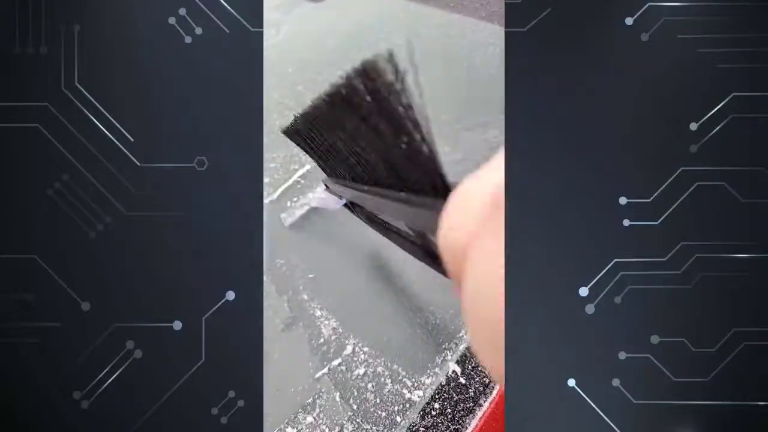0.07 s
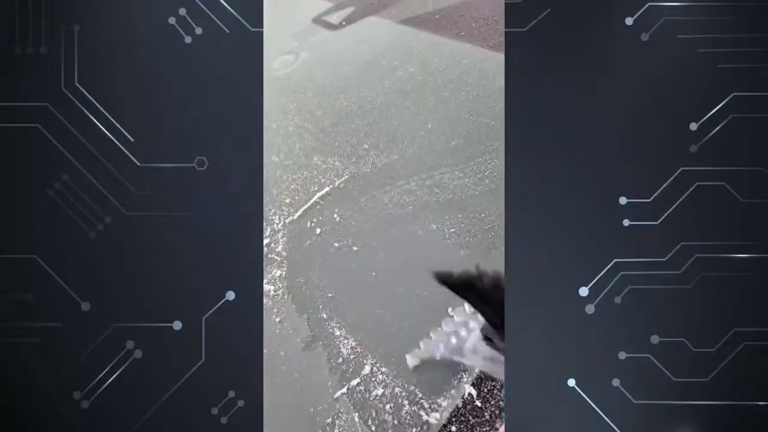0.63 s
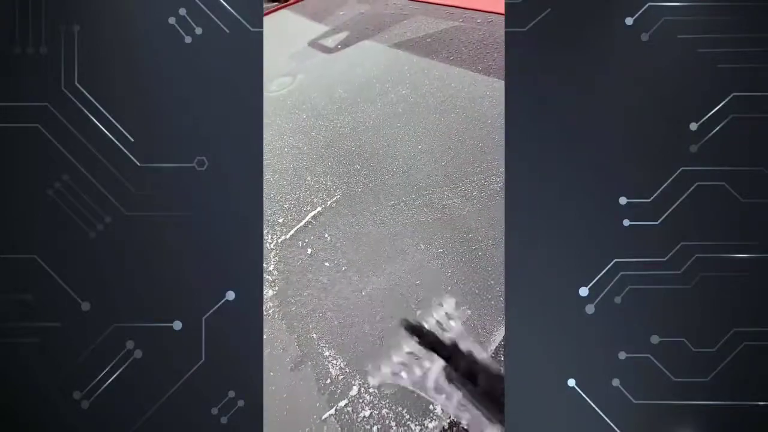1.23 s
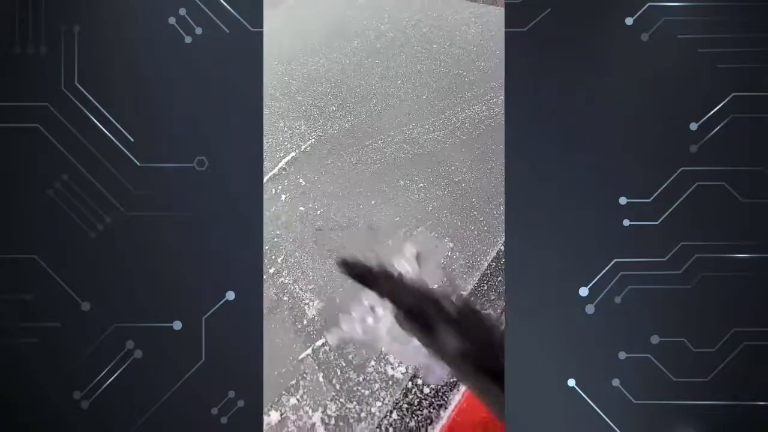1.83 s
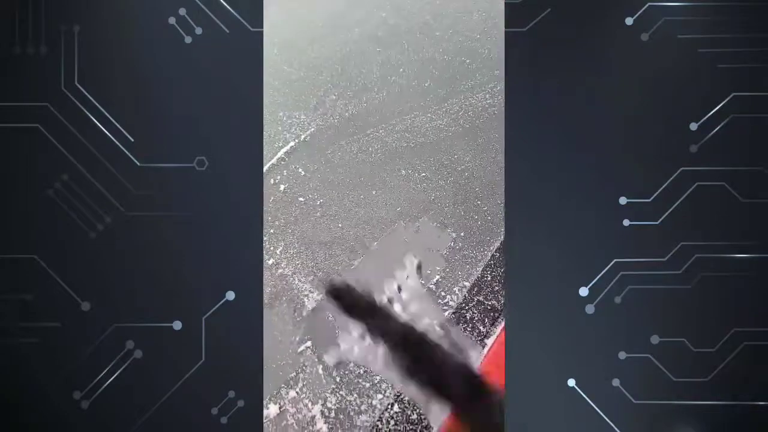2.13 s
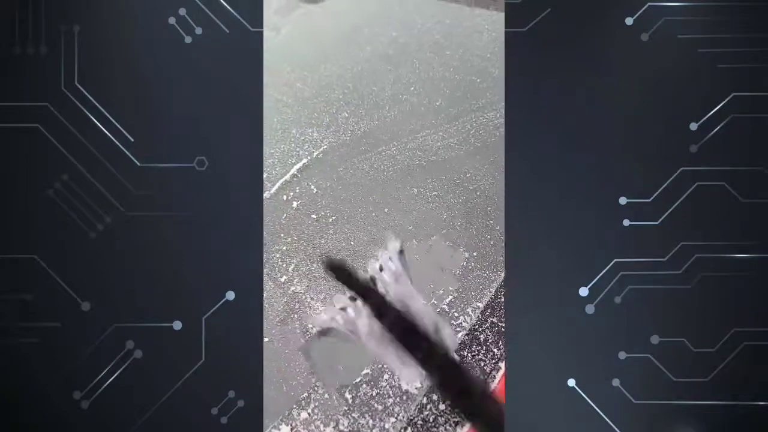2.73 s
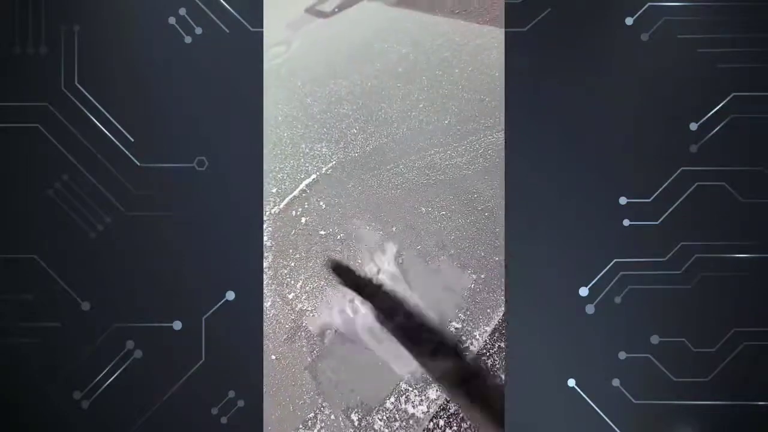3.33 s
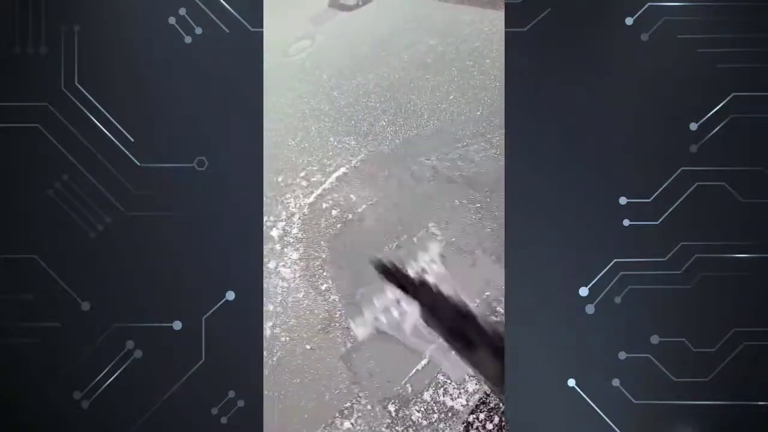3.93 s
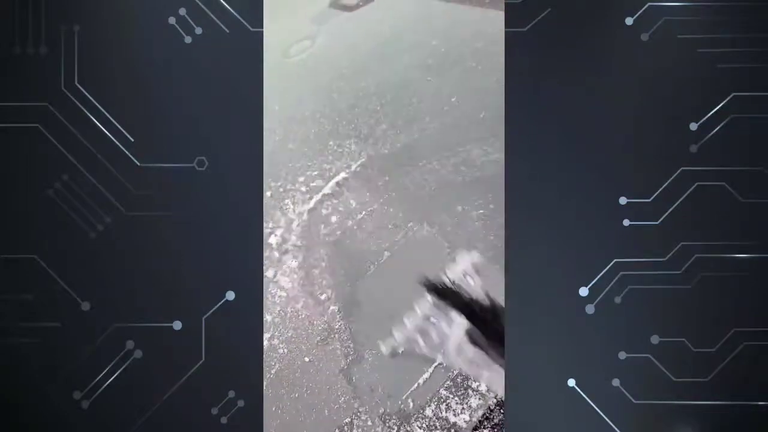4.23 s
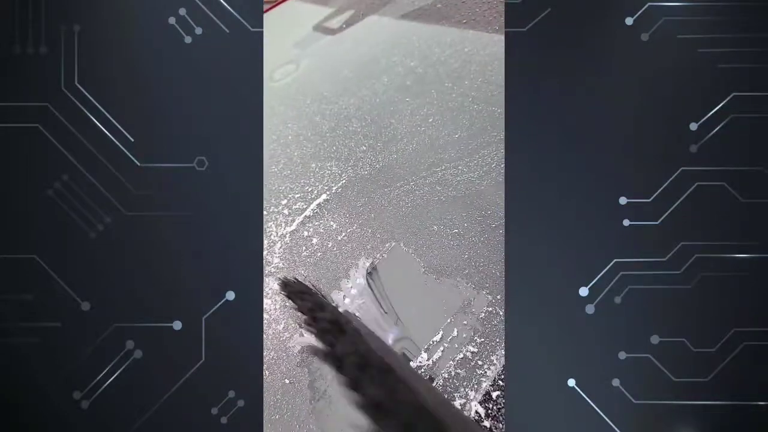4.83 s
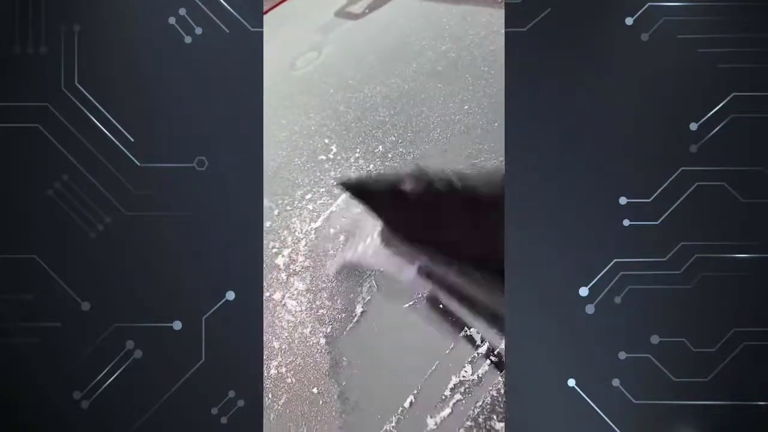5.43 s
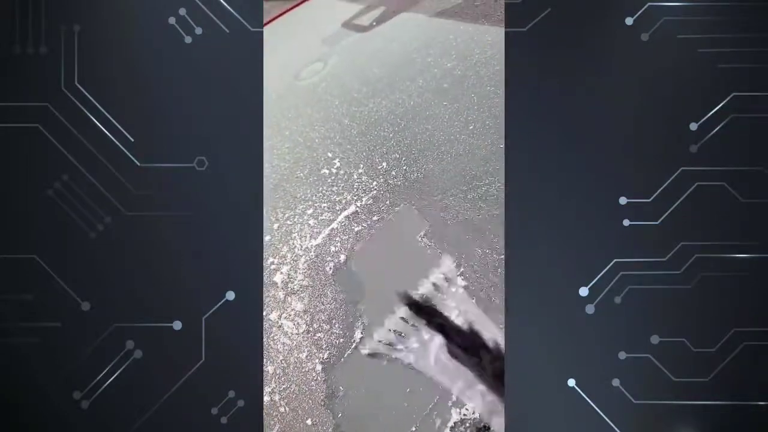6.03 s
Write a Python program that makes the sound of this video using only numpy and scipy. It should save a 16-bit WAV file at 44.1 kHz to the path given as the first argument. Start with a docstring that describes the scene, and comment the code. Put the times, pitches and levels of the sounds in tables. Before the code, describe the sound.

A plastic ice scraper is heard close up on a frosted car windshield outdoors. For the first half second it slides with a swelling, hollow hiss and a short low squeak. At about 0.8 and 1.1 seconds the blade bites and judders, giving quick runs of cracks that thump the glass. From there, short crunching pushes come unevenly, roughly three a second, with lighter hissing glides between them and loose ice crumbs ticking. Two sharp cracks stand out near 2.8 seconds, and another judder comes around 3.4. Brief, rough squeaks appear at about 3.7, 4.6, 5.1 and 5.8 seconds. A longer, stronger crunch lands near 5.5 seconds, followed by one more push and a light slide at 6. Distant traffic rumbles softly throughout, a little stronger at the start.

```python
"""A light hiss glides over frost, close by, above the rumble of distant traffic in a parking lot.
It is a plastic ice scraper on a car windshield. On each push the blade bites into the ice, sticks
and breaks free with cracks that thump the pane; between pushes it glides back. Friction rings the
scraper's resonances and now and then squeaks, while loose crumbs of ice tick under the blade."""
import sys
import numpy as np
from scipy import signal
from scipy.fft import rfft, irfft, next_fast_len
from scipy.io import wavfile
from scipy.ndimage import uniform_filter1d

SR = 44100
rng = np.random.default_rng(int(sys.argv[2]) if len(sys.argv) > 2 else 0)


def transcribe(signal):
    """Save signal, clipped to [-1, 1], as a 16-bit WAV file at the path in sys.argv[1]."""
    frames = np.atleast_2d(signal).T
    limited = np.clip(frames, -1, 1)
    pcm = np.round(limited * 32767).astype(np.int16)
    wavfile.write(sys.argv[1], SR, pcm)


N = 268128

# resonances of the scraper: centre_hz, width_hz, gain_db
BLADE_MODES = [(858, 150, 2), (1170, 155, 5.5), (1260, 390, 1), (2107, 114, 10.5), (2566, 180, 3),
               (2860, 150, 4.5), (4010, 520, -2.5), (6670, 280, -7)]
# high resonances of its thin edge: centre_hz, width_hz, gain_db
EDGE_MODES = [(4040, 330, -4.5), (5650, 190, -4.5), (7510, 370, -0.5), (9680, 170, 2), (10500, 440, -0.5),
              (12050, 380, 0), (12750, 310, 3), (16300, 220, -4)]
# spectrum of ice crushed by the blade: frequency_hz, gain_db
BITE_SPECTRUM = [(240, -13.5), (400, -8), (527, -2.5), (1340, -2), (1740, -12.5), (2220, 0.5), (3360, -6.5),
                 (4030, -1.5), (6190, -7.5), (7320, -2), (9070, -9.5), (13100, -4.5), (15500, -17.5)]


def amp(db):
    """Decibels to amplitude ratio."""
    return 10 ** (np.asarray(db) / 20)


def unit(x):
    """Normalisation to rms 1."""
    return x / np.sqrt(np.mean(x ** 2) + 1e-20)


def add(track, start_s, x):
    """Superposition: x is summed into the track from start_s."""
    start = max(round(start_s * SR), 0)
    part = track[start:start + len(x)]
    part += x[:len(part)]


def wobble(rate_hz):
    """Band-limited noise: a smooth curve through rate_hz random knots a second."""
    knots = rng.standard_normal(int(N * rate_hz / SR) + 4)
    fine = signal.resample_poly(knots, 8, 1)
    return np.interp(np.arange(N) * rate_hz / SR, np.linspace(0, len(knots), len(fine), endpoint=False), fine)


def filtered(x, response):
    """Linear filtering: the spectrum of x is multiplied by a frequency response."""
    size = next_fast_len(N + SR // 2)
    return irfft(rfft(x, size) * response(np.fft.rfftfreq(size, 1 / SR)), size)[:N]


def coloured(x, spectrum):
    """Minimum-phase filtering gives x a spectral envelope, causally and at unit power gain."""
    def response(hz):
        frequency_hz, gain_db = np.transpose(spectrum)
        gain = unit(amp(np.interp(np.log(hz + 1), np.log(frequency_hz), gain_db)))
        cepstrum = irfft(np.log(gain + 1e-6))
        half = len(cepstrum) // 2
        return np.exp(rfft(np.r_[cepstrum[0], 2 * cepstrum[1:half], np.zeros(half)]))
    return filtered(x, response)


def resonate(x, modes):
    """Forced vibration: x drives damped modes of alternating sign, at unit power gain overall."""
    def response(hz):
        total = sum((-1) ** k * amp(db) * 1j * hz * width / (centre ** 2 - hz ** 2 + 1j * hz * width)
                    for k, (centre, width, db) in enumerate(modes))
        return total / np.sqrt(np.mean(np.abs(total) ** 2))
    return filtered(x, response)


def grit(rate_hz, spread_db, judder_hz, judder_db):
    """Shot noise at rms 1: ice crystals break at random, in clumps as the edge sticks and slips."""
    breaks = rng.random(N) < rate_hz / SR
    sizes = rng.standard_normal(N) * amp(spread_db * rng.standard_normal(N))
    return unit(breaks * sizes * amp(judder_db * np.tanh(wobble(judder_hz))))


def strokes(rows, edge_s, arch_db=0):
    """Amplitude envelope of contact: each stroke sets in, swells along an arch and lets go."""
    envelope = np.zeros(N)
    for start, end, level_db, swell_db in rows:
        t = np.arange(max(int((start - .03) * SR), 0), int((end + .03) * SR)) / SR
        touch = (1 + np.tanh((t - start) / edge_s)) * (1 + np.tanh((end - t) / edge_s)) / 4
        position = np.interp(t, [start, end], [-1, 1])
        add(envelope, t[0], touch * amp(level_db + swell_db * position / 2 - arch_db * position ** 2))
    return envelope


def glides():
    """Sliding friction on frost hisses and rings the scraper; returns sound and force on the pane."""
    # slides over the frost: start_s, end_s, level_db, swell_db
    slides = [(-.05, .1, -30, 2.5), (.125, .412, -24.5, 16.5), (.635, .7, -20, -4), (.903, .997, -24.5, 2),
              (1.23, 1.307, -30.5, 9), (1.528, 1.6, -28.5, 6), (1.818, 1.868, -34.5, -19),
              (2.075, 2.15, -42, 12), (2.378, 2.435, -31, -9), (2.925, 2.955, -37, -4),
              (3.208, 3.305, -34, 18), (3.508, 3.565, -26.5, 0), (3.725, 3.808, -23, -0.5),
              (3.828, 3.955, -27, 3), (4.22, 4.302, -28.5, 6), (4.565, 4.592, -39, -5),
              (4.648, 4.685, -36, 1), (4.697, 4.725, -35, -13), (4.905, 4.965, -41, -15),
              (5.178, 5.296, -23.5, 4), (5.292, 5.335, -37.5, 3), (5.365, 5.399, -27.5, -16),
              (5.565, 5.695, -26, -6.5), (5.918, 6.04, -30.5, 4.5)]
    # hollow ring of the blade, strong while it is loosely held: time_s, gain_db
    looseness = [(0, -6), (.2, 3), (.33, 4), (.64, -5.5), (1.3, -4), (3.8, -7.5), (6, -7.5)]
    # spectrum of rubbed frost: frequency_hz, gain_db
    frost_spectrum = [(240, -46), (400, 3), (527, -11.5), (595, 0), (1260, -12.5), (1420, 3), (1710, -10),
                      (2090, -5), (6280, -6.5), (7320, -3.5), (8930, -13.5), (12900, -4), (15500, -4.5)]
    # the level arches as the hand speeds up and slows down
    strength = strokes(slides, edge_s=0.002, arch_db=13.5) * amp(1.8 * wobble(110))
    ring = amp(np.interp(np.arange(N) / SR, *np.transpose(looseness)))
    frost = strength * grit(rate_hz=16000, spread_db=3.0, judder_hz=425, judder_db=1.0)
    rub = strength * grit(rate_hz=9000, spread_db=-0.5, judder_hz=242, judder_db=1.5)
    hiss = amp(-1.5) * coloured(frost, frost_spectrum) + amp(-4.5) * resonate(rub, EDGE_MODES)
    return hiss + resonate(ring * rub, BLADE_MODES), amp(-22) * frost


def traffic(cutoff_hz=3200, hiss_db=-65):
    """Low-passed noise: distant traffic rumbles unsteadily over a faint even hiss."""
    # spectrum of the traffic: frequency_hz, gain_db
    spectrum = [(15, -23), (25, 2), (140, -1), (433, -7.5), (598, -19), (804, -16), (1410, -19.5),
                (1660, -25), (1850, -23.5), (5280, -35.5), (15500, -18.5)]
    # slow rise and fall of the rumble: time_s, level_db
    levels = [(0, -30.5), (.7, -34), (1.0, -43), (1.8, -45.5), (2.9, -40), (4.5, -44.5), (4.9, -39),
              (5.3, -35.5), (5.6, -45), (6.08, -42.5)]
    level_db = np.interp(np.arange(N) / SR, *np.transpose(levels))
    noise = coloured(rng.standard_normal(N), spectrum)
    rumble = filtered(noise, lambda hz: 1 / np.hypot(1, (hz / cutoff_hz) ** 2))
    return amp(level_db + 2.6 * wobble(10)) * rumble + amp(hiss_db) * rng.standard_normal(N)


def crumbs(rate_hz=110, spread_db=4, decay_s=0.002, flurry_db=7):
    """Impulse excitation: loose ice is crushed in flurries of tiny bursts that make the blade ping."""
    crushed = rng.random(N) < rate_hz / SR
    sizes = crushed * amp(spread_db * np.clip(rng.standard_normal(N), -2, 2))
    envelope = signal.lfilter([1], [1, -np.exp(-1 / (decay_s * SR))], sizes)
    ticks = envelope * rng.standard_normal(N) * amp(flurry_db * np.tanh(wobble(6.1)))
    return amp(-55) * coloured(ticks, BITE_SPECTRUM) + amp(-53.5) * resonate(ticks, BLADE_MODES)


def squeaks(waver_hz=22, flutter_db=3.5, octave_db=-14):
    """Stick-slip oscillation locks briefly to a resonance: a rough, wavering tone with a weak octave."""
    # chatter of the edge: crest_s, length_s, pitch_hz, level_db
    chatters = [(0.217, 0.17, 420, -30), (3.744, 0.12, 850, -28), (4.597, 0.042, 5060, -37),
                (5.109, .09, 857, -29.5), (5.753, 0.028, 880, -25), (5.821, 0.038, 850, -27)]
    t = np.arange(N) / SR
    drift_hz = waver_hz * wobble(160)
    tones = np.zeros(N)
    for crest_s, length_s, pitch_hz, level_db in chatters:
        swell = np.cos(np.pi * np.clip((t - crest_s) / length_s, -.5, .5)) ** 2
        phase = 2 * np.pi * np.cumsum(pitch_hz + drift_hz) / SR
        tones += amp(level_db) * swell * (np.sin(phase) + amp(octave_db) * np.sin(2 * phase))
    return np.sqrt(2) * tones * amp(flutter_db * wobble(110))


def slips(growth_db=5):
    """Stick-slip releases, single or in even runs with growing thumps: time_s, crack_db, thump_db."""
    # single chips breaking off: time_s, crack_db
    singles = [(.439, -16), (.731, -26), (1.571, -19), (1.636, -12), (1.764, -19.5), (1.947, -8.5),
               (1.974, -8), (2.454, -14), (2.484, -9.5), (2.687, -25.5), (2.755, -3.5), (2.816, -2.5),
               (2.904, -22.5), (3.213, -24.5), (3.637, -25), (3.698, -8), (3.718, -9), (3.978, -23.5),
               (4.058, -9), (4.187, -8), (4.424, -7), (4.7, -24), (4.725, -22), (4.758, -6), (4.878, -40),
               (4.914, -20.5), (5.012, -17), (5.064, -13.5), (5.079, -7), (5.282, -8), (5.397, -16),
               (5.712, -10), (5.755, -9.5), (5.813, -7)]
    # runs of sticking and slipping: first_s, last_s, count, crack_db
    judders = [(0.749, 0.802, 5, -7), (1.055, 1.107, 4, -7.5), (2.203, 2.232, 4, -7), (3.026, 3.04, 2, -6),
               (3.336, 3.393, 5, -6), (5.452, 5.491, 4, -8.5)]
    rows = [(time_s, crack_db, crack_db - 15.5) for time_s, crack_db in singles]
    for first_s, last_s, count, crack_db in judders:
        for progress in np.linspace(0, 1, round(count)):
            thump_db = crack_db - 13 - growth_db * (1 - progress)
            rows.append((first_s + progress * (last_s - first_s), crack_db, thump_db))
    return rows


def shoves(blows, rise_s=0.00029, rebound_s=0.00984):
    """Reflection: each blow on the glass returns from the frame as a weaker, inverted bending wave."""
    force = np.zeros(N)
    t = np.arange(SR // 25) / SR
    pulse = t / rise_s * np.exp(-t / rise_s)
    for time_s, level_db in blows:
        add(force, time_s, amp(level_db) * pulse)
        add(force, time_s + rebound_s * rng.uniform(0.884, 1.16), -amp(level_db - 3.7) * pulse)
    return force


def cracks(rise_s=0.00036, fall_s=0.0025):
    """Brittle fracture: each slip shatters a chip and shoves the glass; returns sound and force."""
    # spectrum of snapping ice: frequency_hz, gain_db
    snap_spectrum = [(210, -24.5), (350, -2), (671, -14), (1060, -2.5), (1480, -9.5), (2540, -3.5),
                     (3330, -7.5), (4030, -7), (8760, -12), (13000, -5), (15500, -11)]
    chips, releases = np.zeros(N), slips()
    t = np.arange(SR // 25) / SR
    burst = (1 - np.exp(-t / rise_s)) ** 2 * np.exp(-t / fall_s)
    debris = amp(-20) * np.exp(-t / .0055) * (1 - np.exp(-t / rise_s))
    envelope = burst / burst.max() + debris
    for time_s, crack_db, _ in releases:
        add(chips, time_s - .0006, amp(crack_db - 3.0) * envelope * rng.standard_normal(len(t)))
    sound = coloured(chips, snap_spectrum) + amp(-18.5) * resonate(chips, BLADE_MODES)
    return sound, shoves([(time_s, thump_db) for time_s, _, thump_db in releases])


def pushes(edge_s=0.0031, growth_db=9.5, spring_lead_s=0.00594, grind_hz=420):
    """Elastic loading: crunching ice piles up until the pane springs back; returns sound and force."""
    # bites into the ice: start_s, end_s, level_db, swell_db, load_db
    bites = [(.745, 0.814, -33, -7.5, -17), (1.048, 1.117, -23, 15.5, -27), (1.326, 1.374, -27.5, 10, -25),
             (1.623, 1.664, -21.5, 9.5, -31), (1.671, 1.701, -14.5, -0.5, -26),
             (1.91, 1.976, -20.5, 10.5, -23.5), (2.186, 2.234, -17.5, 11, -26.5),
             (2.446, 2.466, -24.5, -5, -58), (2.475, 2.494, -20, 13, -18), (3.333, 3.386, -23.5, 0, -13.5),
             (3.691, 3.738, -19.5, 1.5, -21), (4.008, 4.054, -35.5, 12, -50), (4.055, 4.07, -16, 5, -19.5),
             (4.407, 4.426, -26, 9, -22), (4.723, 4.767, -16.5, 3, -24.5),
             (5.077, 5.163, -19.5, -11.5, -25.5), (5.395, 5.508, -15, -4, -15),
             (5.711, 5.796, -21.5, -1, -35), (5.801, 5.828, -14, 7.5, -22.5)]
    # treble ring of the finest splinters: centre_hz, width_hz, gain_db
    splinter_modes = [(13640, 3400, 0)]
    strength = strokes([row[:-1] for row in bites], edge_s) * amp(1.5 * wobble(130))
    load = strokes([(start, end, load_db - growth_db / 2, swell_db + growth_db)
                    for start, end, _, swell_db, load_db in bites], edge_s)
    releases = [(end - spring_lead_s, load_db + 2) for _, end, _, _, load_db in bites]
    spring = shoves(releases, rise_s=.0003, rebound_s=.0108)
    ice = grit(rate_hz=15000, spread_db=1.5, judder_hz=258.7, judder_db=3.5)
    crunch = amp(-1.5) * coloured(strength * ice, BITE_SPECTRUM)
    splinters = amp(-5.5) * resonate(strength * ice, splinter_modes)
    edge_ring = amp(-14) * resonate(strength * rng.standard_normal(N), EDGE_MODES)
    grind = filtered(load * ice, lambda hz: 1 / (1 + 1j * hz / grind_hz))
    return crunch + splinters + edge_ring, grind + spring


def shifting_contact(x, depth_db=2.6):
    """Time-varying filtering: parts of the edge touch in turn, each with its own colour."""
    spectra = signal.stft(x, nperseg=512)[2]
    field = uniform_filter1d(rng.standard_normal(spectra.shape), size=3, axis=0)  # smooth in frequency
    field = uniform_filter1d(field, size=20, axis=1)  # and in time
    return signal.istft(spectra * unit(amp(depth_db * unit(field))), nperseg=512)[1][:N]


def reflections(x, t60_s=0.055):
    """Reverberation: the car body and its neighbours return a short, exponentially decaying tail."""
    t = np.arange(SR // 3) / SR
    tail = rng.standard_normal(len(t)) * amp(-60 * t / t60_s) * (t > .004)
    return signal.fftconvolve(x, tail / np.linalg.norm(tail))[:N]


def windshield(force):
    """Plate vibration: the blade's force drums on the low bending modes of the pane."""
    # bending modes of the glass: centre_hz, width_hz, gain_db
    pane_modes = [(76.4, 11, 0), (107, 45, -2.5), (141.8, 25.7, 4), (228.4, 18, 1.5), (311, 23.4, 3.5),
                  (377.4, 36, -2), (466, 116, -3.5), (581, 560, -6.5)]
    return resonate(force, pane_modes)


def scene():
    """Superposition: the contact radiates directly and through the pane, over the traffic."""
    contact, force = np.sum([pushes(), glides(), cracks()], axis=0)
    contact = shifting_contact(contact)
    scraping = contact + amp(-23) * reflections(contact) + windshield(force)
    return (scraping + crumbs() + squeaks() + traffic())[None]


def record(dry, ceiling=0.9, low_cut_hz=44, high_cut_hz=15750):
    """Saturation and band limiting: the microphone rounds peaks and loses deep bass and top treble."""
    rounded = dry[0] / (1 + np.abs(dry[0] / ceiling) ** 6) ** (1 / 6)
    thinned = filtered(rounded, lambda hz: hz ** 2 / np.hypot(hz ** 2, low_cut_hz ** 2))
    return filtered(thinned, lambda hz: 1 / (1 + (hz / high_cut_hz) ** 160))[None]


dry = scene()
out = record(dry)
transcribe(out)
```